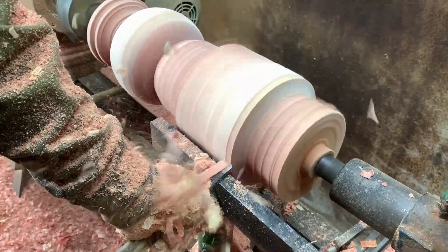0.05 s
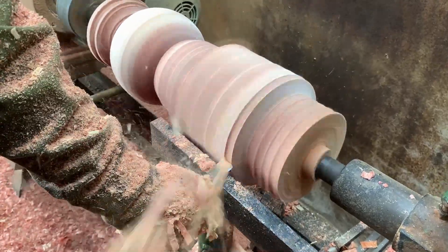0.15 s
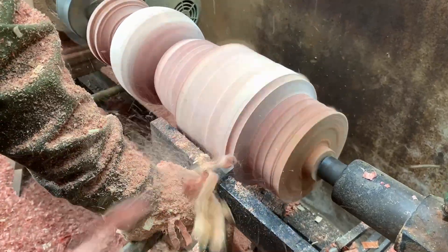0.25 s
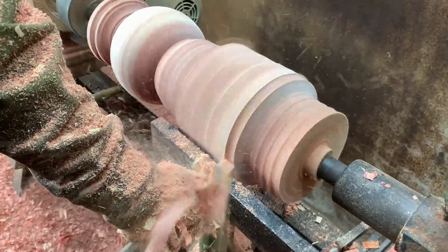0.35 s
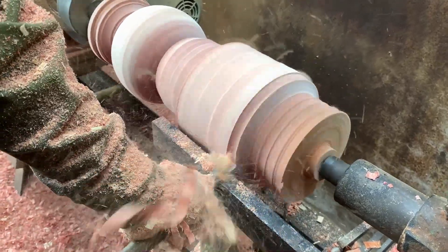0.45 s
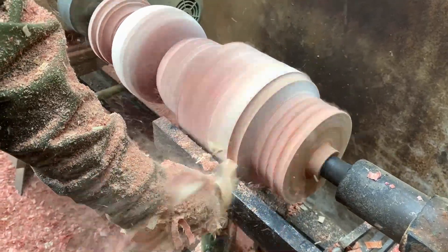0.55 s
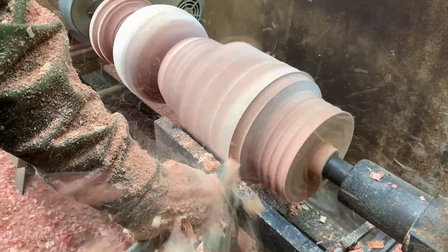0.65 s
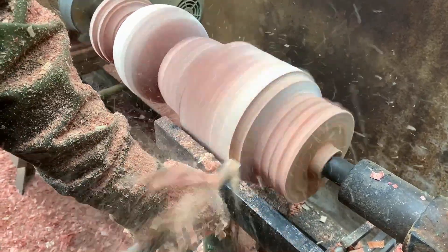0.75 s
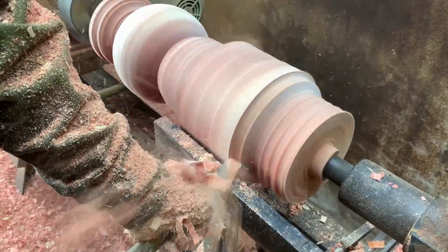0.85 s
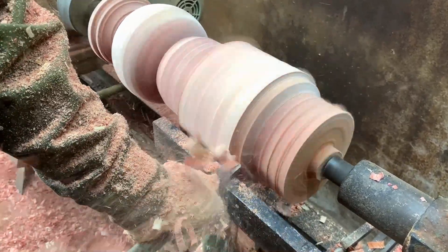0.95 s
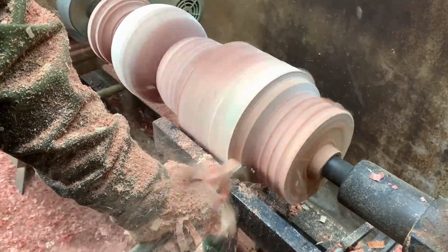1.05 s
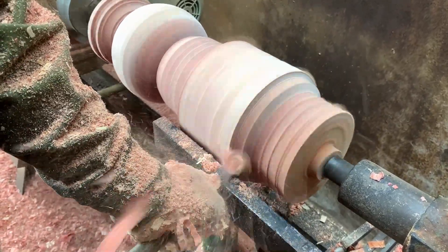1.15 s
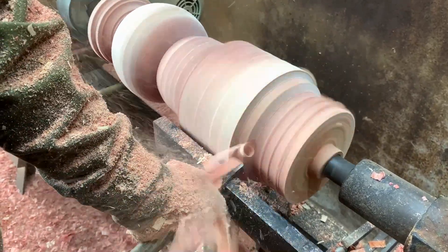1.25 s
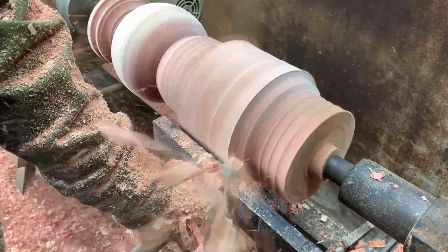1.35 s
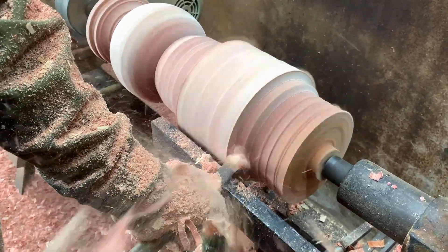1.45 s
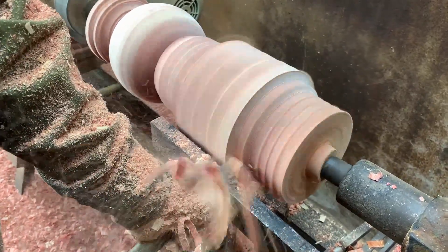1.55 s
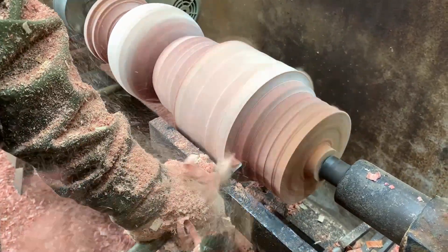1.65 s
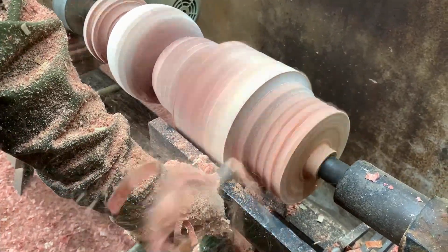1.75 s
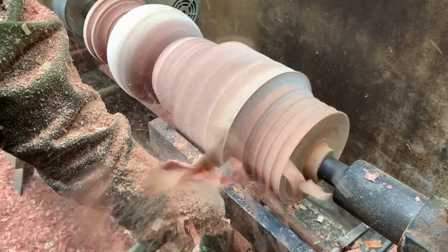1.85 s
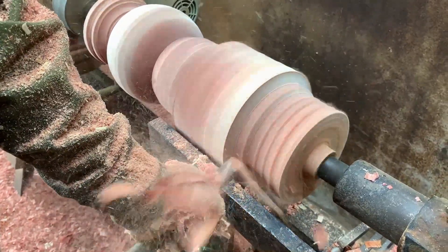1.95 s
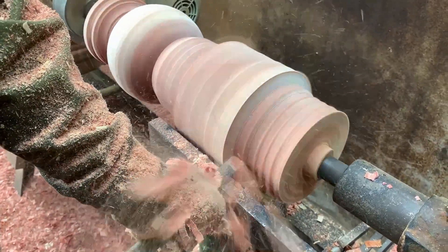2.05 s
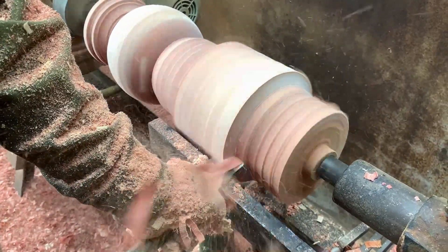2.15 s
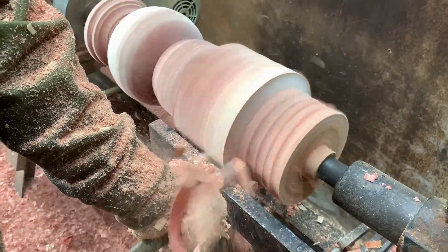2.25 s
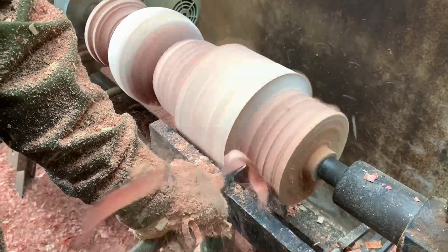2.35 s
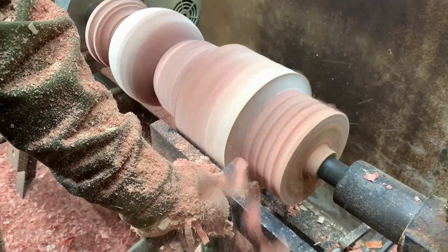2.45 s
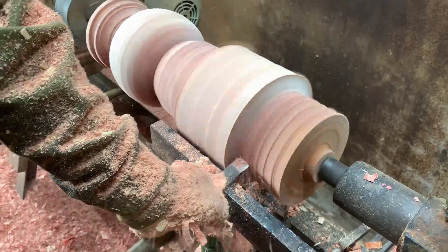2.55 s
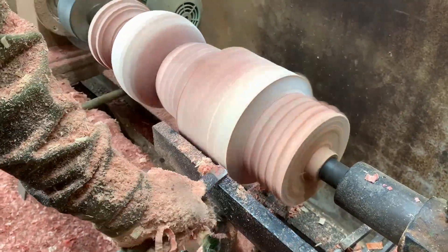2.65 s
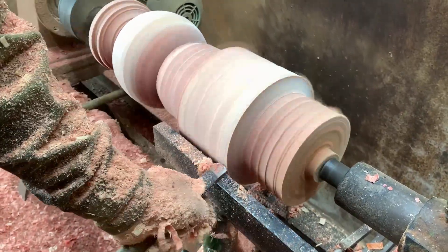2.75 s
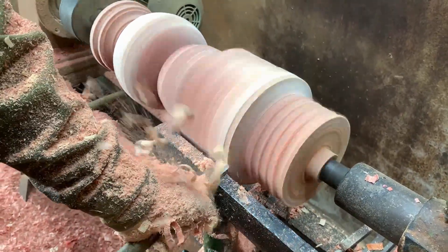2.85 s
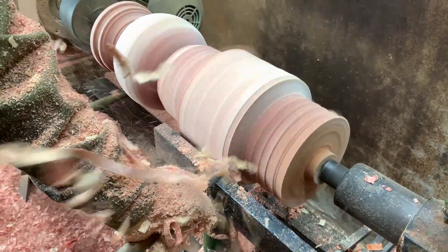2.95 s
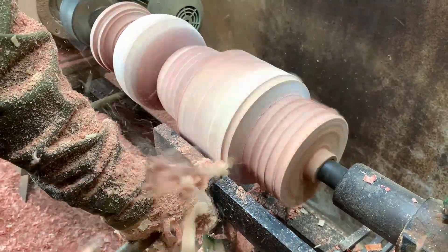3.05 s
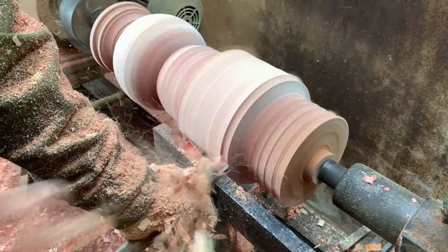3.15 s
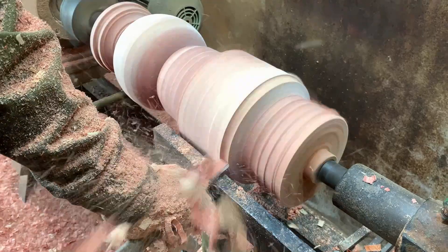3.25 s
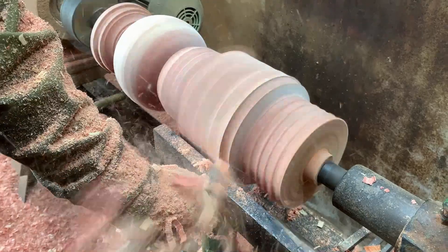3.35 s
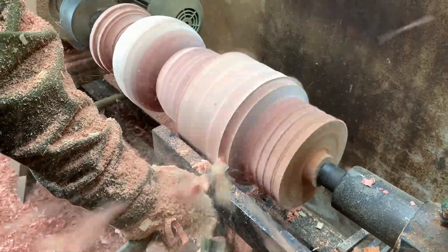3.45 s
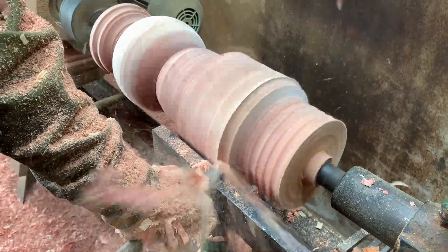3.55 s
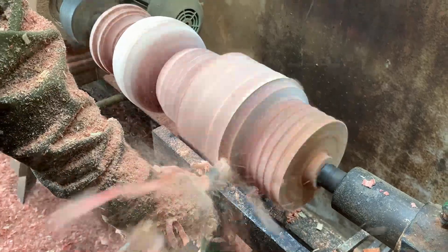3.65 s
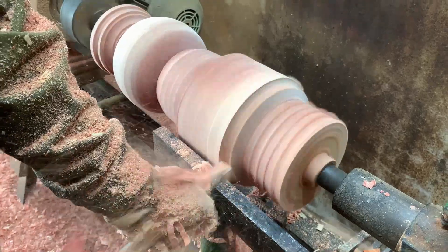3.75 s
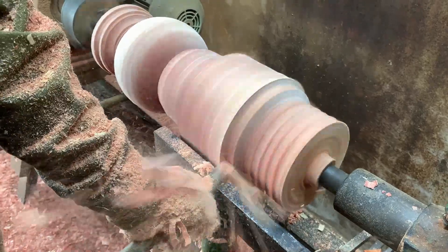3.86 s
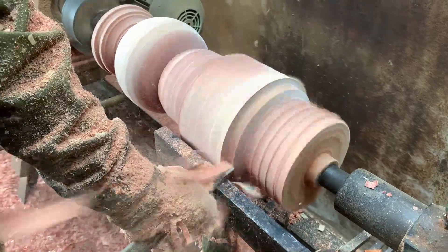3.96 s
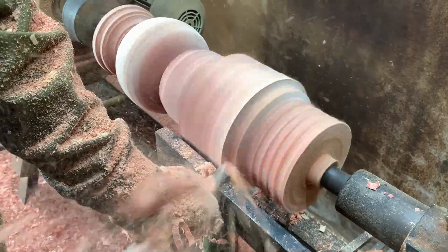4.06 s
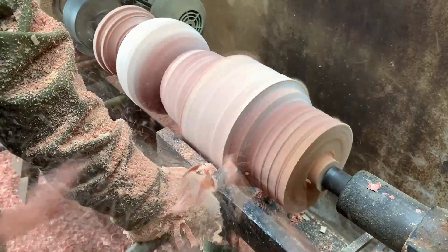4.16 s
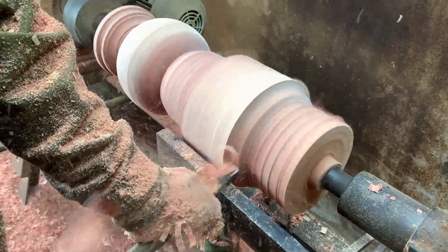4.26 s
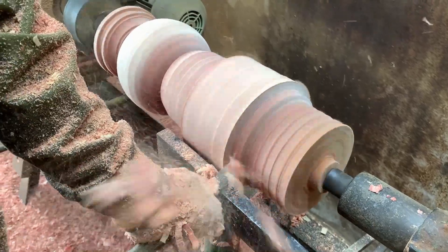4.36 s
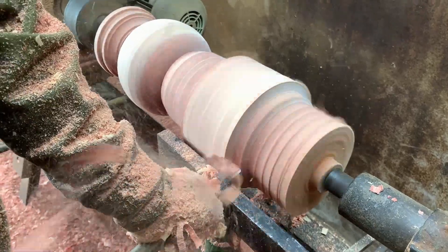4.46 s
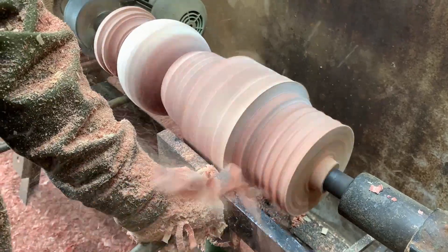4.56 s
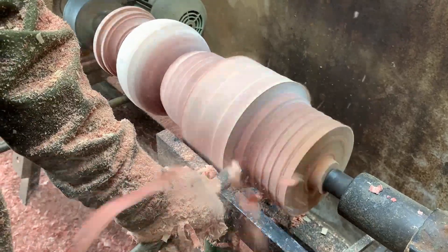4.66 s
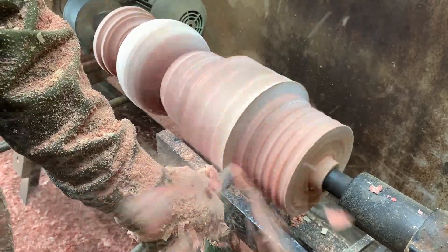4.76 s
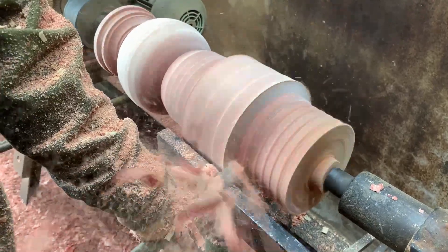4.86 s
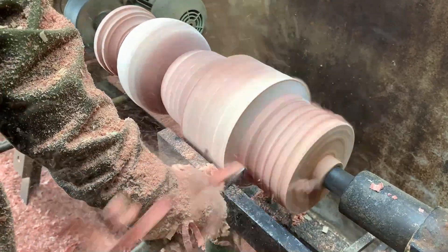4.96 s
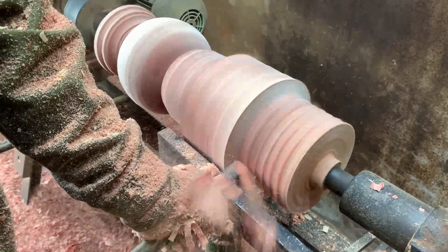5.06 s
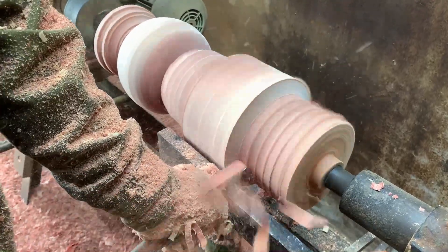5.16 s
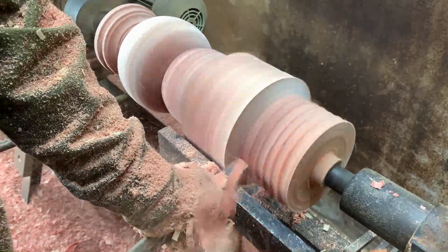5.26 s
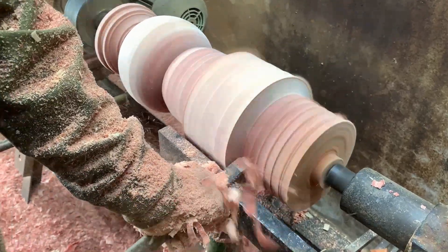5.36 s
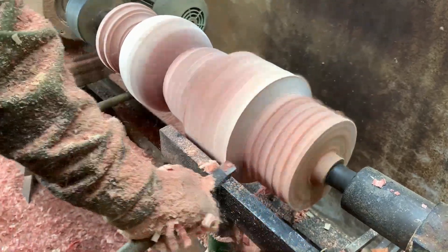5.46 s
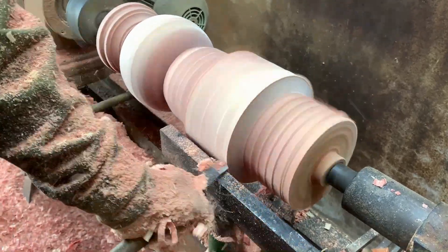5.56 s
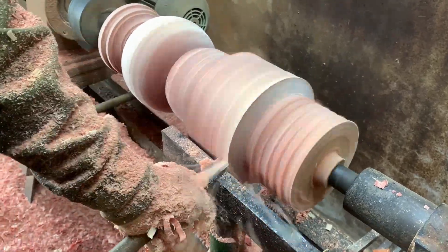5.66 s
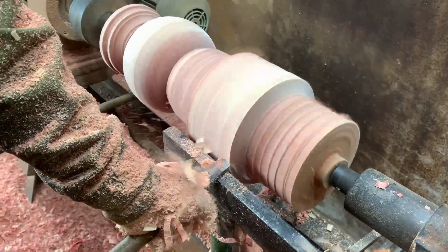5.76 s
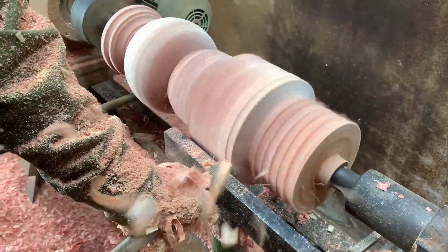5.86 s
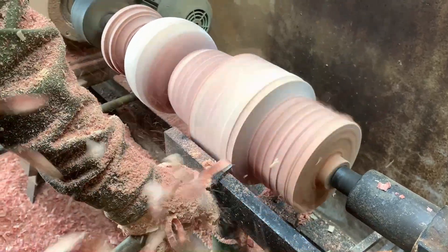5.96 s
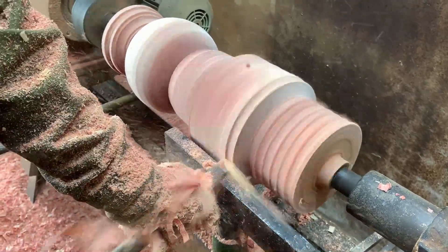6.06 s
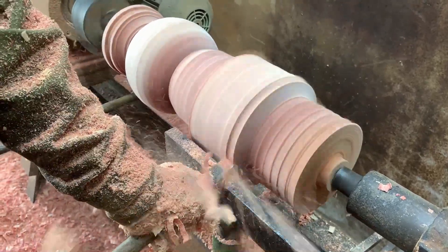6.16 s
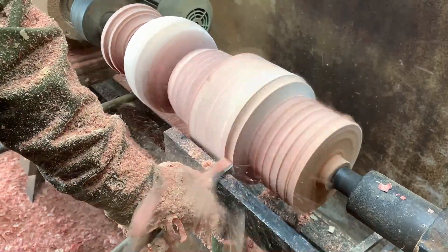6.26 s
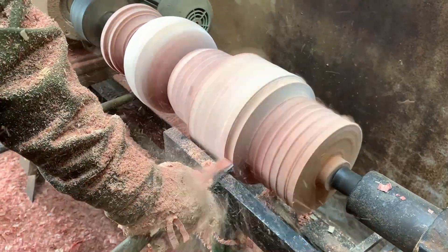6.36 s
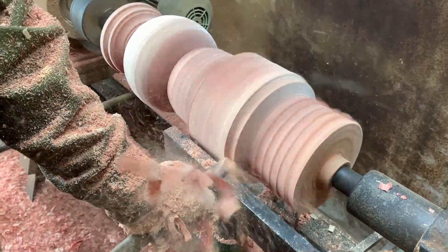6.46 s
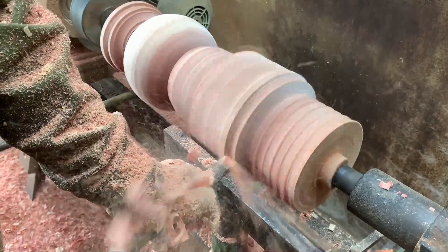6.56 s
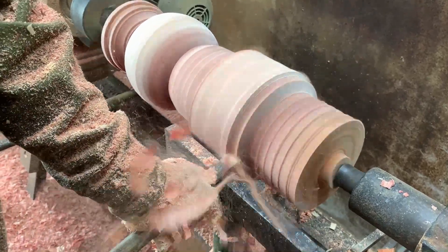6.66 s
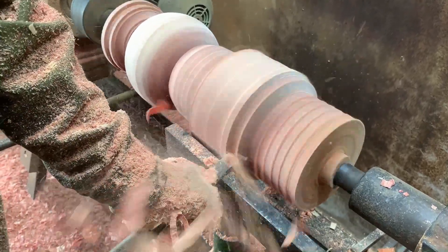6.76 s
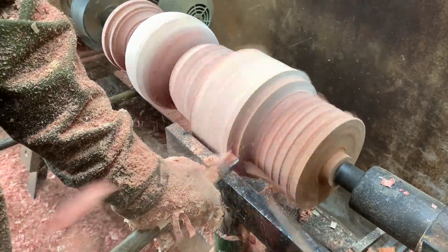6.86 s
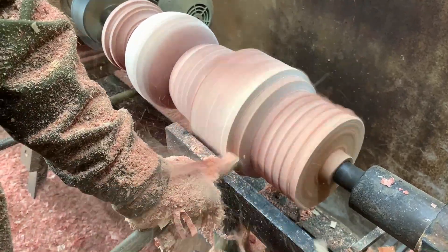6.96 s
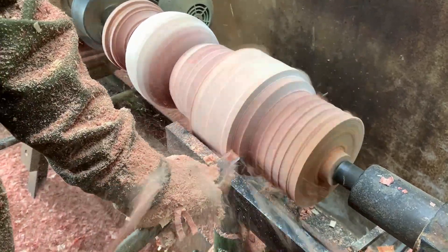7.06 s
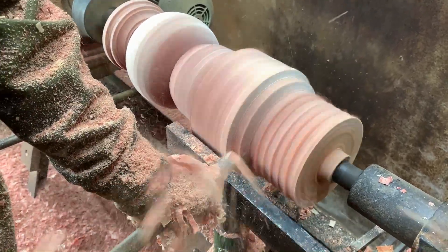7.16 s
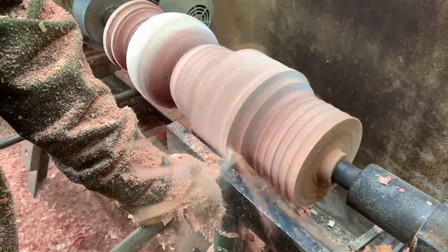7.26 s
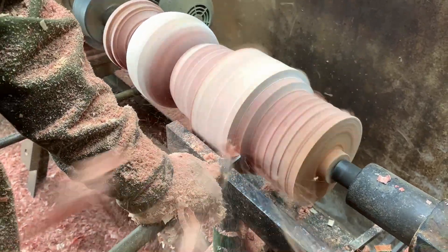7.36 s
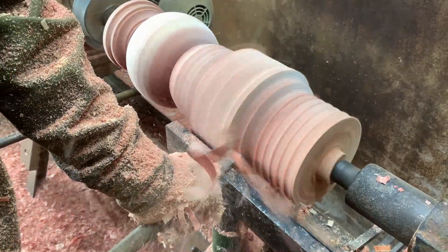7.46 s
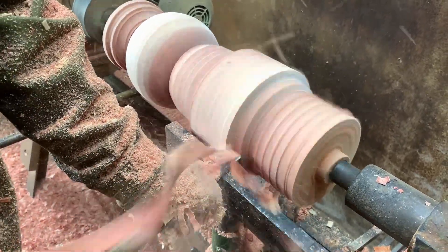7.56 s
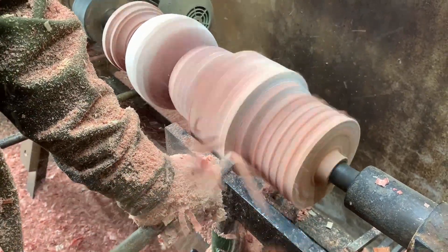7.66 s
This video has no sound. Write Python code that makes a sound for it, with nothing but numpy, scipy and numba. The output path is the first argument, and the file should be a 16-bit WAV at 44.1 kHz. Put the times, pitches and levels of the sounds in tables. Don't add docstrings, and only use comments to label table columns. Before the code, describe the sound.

Close woodturning on a lathe: bright fluttering scraping squeals downward as the cut deepens, breaks off twice, stutters back in, while shavings softly thud.

```python
import sys
import numpy as np
from scipy import signal
from scipy.fft import rfft, irfft
from scipy.io import wavfile
from scipy.ndimage import uniform_filter1d
from numba import njit

SR = 44100
rng = np.random.default_rng(int(sys.argv[2]) if len(sys.argv) > 2 else 0)


def file_out(sig):
    cols = np.atleast_2d(sig).T
    lim = np.clip(cols, -1, 1)
    pcm = np.round(lim * 32767).astype(np.int16)
    wavfile.write(sys.argv[1], SR, pcm)


def gain_from_db(level_db):
    decades = np.asarray(level_db, float) / 20
    return 10 ** decades


N = 339570

# (from [s], to [s], level against the force [dB], rise [dB/s], fall [dB/s])
CONTACTS = [(-1, 2.555, 0, 1000, 380), (2.57, 2.6, -10, 500, 520), (2.857, 2.885, 0, 2200, 1500),
            (2.89, 2.91, -11, 900, 900), (2.922, 5.375, 0, 1400, 280), (5.4, 5.445, -9, 500, 560),
            (5.704, 5.73, -8, 2500, 700), (5.762, 5.79, -3, 1500, 400), (5.8, 5.85, -8, 500, 500),
            (5.865, 5.895, -2.5, 700, 200), (5.925, 9, 0, 300, 300)]
STATIONS = np.linspace(0, 1, 5)


def gouge():
    # (time [s], depth [0-1])
    depth_path = [(0, .02), (.7, 0.23), (1.3, 0.46), (2.0, 0.73), (2.65, 0.92), (2.84, 0.07), (3.5, 0.24),
                  (4.15, 0.53), (4.8, 0.77), (5.5, 0.94), (5.69, 0.04), (6.4, 0.17), (7.0, 0.4),
                  (7.7, 0.61)]
    # (time [s], level [dB])
    force_path = [(0, .7), (.3, 1.5), (.6, 0), (.8, 1.2), (1.15, 0), (1.5, 2), (1.75, -1.8), (2.2, .5),
                  (3, -.5), (3.25, 1.5), (3.45, -1.5), (4.25, 1.5), (4.5, -1), (4.85, 1.5), (5.1, -.5),
                  (6.5, -2.6), (6.9, 1.2), (7.3, -2.2)]
    # (width [Hz], pitch at each station [Hz], top at each station [dB])
    blank_modes = [(250, [454, 454, 420, 454, 454], [-13.5, -20, -20.5, -21, -15.5]),
                   (68, [595, 595, 595, 595, 598], [0, 0, 0, 0, 0]), (700, [920, 950, 900, 930, 900],
                   [-15.5, -22.5, -19, -17, -20]), (140, [1100, 1060, 1066, 1084, 1055],
                   [-10, -15, -13.5, -7.5, 7]), (157, [1203, 1205, 1160, 1195, 1200],
                   [-12, -11.5, -9, -11.5, -28])]
    tool_modes = [(850, [1760, 1900, 1940, 1840, 1670], [-44.5, -15.5, -14.5, -11.5, -18.5]),
                  (170, [2560, 2303, 2227, 1950, 1700], [-0.5, 2, 1, 1, 5]),
                  (487, [2180, 2220, 2650, 2340, 2210], [0, -9, -15, -14, -9.5]),
                  (216, [3823, 3192, 2995, 3006, 2960], [15, 11, -0.5, -4, 0]),
                  (1300, [3640, 3150, 3200, 3730, 3600], [3.5, 4, -13, -15, -15.5]),
                  (320, [4900, 4760, 4880, 4870, 4840], [9, 0.5, -11, -12, -15.5]),
                  (930, [4940, 4900, 5300, 5150, 5270], [-7, -4, -18.5, -16, -21])]
    edge_modes = [(288, [6620, 6377, 6650, 6360, 6300], [-13.5, -1, -7.5, -27, -35]),
                  (1450, [6660, 7090, 7560, 8040, 8300], [2.5, -10, -15.5, -14.5, -19]),
                  (424, [8200, 8160, 8430, 8640, 8100], [4, -1.5, -3, -1, 7]),
                  (4000, [9800, 9660, 8950, 10200, 9050], [-6, -9.5, -6.5, -7.5, -4]),
                  (300, [9950, 9900, 10100, 10300, 9900], [-5, -16, -3, -25, -9]),
                  (350, [10900, 10330, 10600, 10440, 10500], [-27, -11, -2, -17, -26]),
                  (300, [11800, 11800, 11800, 11820, 11800], [-19, -19, -17, -11, -13]),
                  (350, [12420, 12420, 12450, 12400, 12350], [-4.5, -4.5, -5, -9, -11]),
                  (1330, [13040, 12780, 13190, 12230, 13000], [0.5, -3, 3.5, -5, -13]),
                  (2600, [14300, 13500, 14200, 14200, 14300], [-14, -9.5, -14, -13.5, -13])]
    blank_levels = [-42.5, -37.5, -37.5, -37, -34.5]
    tool_levels = [-23.7, -23.7, -24.2, -25.7, -27.2]
    edge_levels = [-30, -30.3, -31, -29.7, -30]
    keenness = [-.3, .8, -.4]
    # (pitch [Hz], width [Hz], share [0-1])
    notches = [
        (4090, 230, 0.7),
        (5664, 700, 0.85),
        (850, 150, 0.83),
    ]

    force_db, bite_db = in_time(force_path), bite()
    depth = np.clip(in_time(depth_path), 0, 1)

    blank_db = np.interp(depth, STATIONS, blank_levels) + .4 * force_db + contact(lets_go=.6) + lift_swell()
    tool_db = np.interp(depth, STATIONS, tool_levels) + force_db + contact(lets_go=1)
    edge_db = np.interp(depth, STATIONS, edge_levels) + .9 * force_db + contact(lets_go=1.4)
    edge_db = edge_db + by_pass(keenness)

    blank = ringing(blank_modes, bite_db, depth, follows=0.17, wobble_hz=2.7)
    tool = ringing(tool_modes, bite_db, depth, follows=.42, wobble_hz=25.0, crisp=.3)
    edge = ringing(edge_modes, bite_db, depth, follows=0.8, wobble_hz=40.0)
    edge = edge + air_pocket(bite_db, depth)

    rasp, shrill = skids()
    cut = gain_from_db(blank_db) * blank + gain_from_db(tool_db) * tool + gain_from_db(edge_db) * (1 + shrill) * edge
    for hz, width, share in notches:
        cut = cut - share * mode(cut, hz, width, 1.)
    return cut + rasp


def bite():
    # (once, twice, thrice), swing [dB]
    grain_swing = [(2.3, 1.1, .9), (2.1, 1.1, 1.05), (3.2, .7, .9)]
    # (once, twice, thrice), delay [ms]
    grain_delay = [(6, 11, 5), (25, 8, 10.5), (45, 14, 8)]
    # (time [s], peak [dB])
    hard_spots = [(0.1067, -17), (0.2458, -15), (0.3137, -12), (0.3531, -17), (0.6055, -15), (1.504, -14),
                  (1.5369, -15), (1.6886, -18), (1.8981, -16), (2.0767, -16), (3.0649, -16), (3.0849, -14),
                  (3.2071, -11), (3.3273, -14), (3.4022, -15), (3.4231, -13), (3.6706, -18), (3.9045, -16),
                  (4.0477, -18), (4.4353, -16), (4.7496, -14), (4.809, -14), (5.0814, -18), (5.2111, -17),
                  (5.248, -16), (5.9249, -19), (6.9247, -17), (7.1846, -17), (7.224, -14), (7.5418, -17)]
    # (first time [s], bites [count], spacing [s], peak [dB])
    knots = [(.7055, 2, .06, -19), (.8430, 3, .06, -16), (1.1435, 8, .06, -15.5), (1.7820, 3, .058, -16),
             (2.14, 3, .05, -17), (2.3195, 3, .06, -17), (2.855, 3, .012, -16), (2.919, 2, .011, -15),
             (2.9485, 2, .02, -17), (4.1705, 3, .06, -15), (4.4510, 9, .0597, -14), (5.703, 2, .058, -17),
             (6.0430, 8, .06, -18)]
    turn_s, knot_spread_db = .06, 1.2

    t = np.arange(N)[:, None] / SR - by_pass(grain_delay) / 1000
    grain = by_pass(grain_swing) * np.cos(2 * np.pi * np.arange(1, 4) * t / turn_s)
    grain_db = np.sum(grain, axis=1)
    chatter_db = 0.35 * drift(36.0)[0] + 1.8 * drift(70.0)[0] + 4.0 * drift(250.0)[0]

    bites = list(hard_spots)
    for first_s, count, every_s, peak_db in knots:
        for k in range(count):
            bites.append((first_s + k * every_s, peak_db + knot_spread_db * rng.standard_normal()))
    s, peak_db = np.transpose(bites)
    spots = bursts(s - .0015, gain_from_db(peak_db + 18), 0 * s + .006)
    return 1.05 * grain_db + 5 * np.tanh(chatter_db / 5) + 20 * np.log10(1 + spots)


def ringing(modes, bite_db, depth, follows, wobble_hz, crisp=0):
    groove_lift_db, groove_width_hz, crisp_above_hz = 11, 500, 3000
    grip = gain_from_db(follows * bite_db)
    grip = grip / np.sqrt(uniform_filter1d(grip ** 2, size=9000))
    tearing = grip * rng.standard_normal((2, 2, N))
    groove_hz, _ = groove(depth)
    out, power = 0, 0
    for k, (width, pitches_hz, tops_db) in enumerate(modes):
        hz = np.interp(depth, STATIONS, pitches_hz) + wobble_hz * drift(25.4)[0]
        top_db = np.interp(depth, STATIONS, tops_db) + 1.33 * drift(5.5)[0] + 1.66 * drift(29.0)[0]
        if width < 800:
            top_db = top_db + groove_lift_db * np.exp(-((hz - groove_hz) / groove_width_hz) ** 2)
        octaves = max(np.log2(pitches_hz[1] / crisp_above_hz), 0)
        top = gain_from_db(top_db + crisp * octaves * bite_db)
        out = out + mode(tearing[k % 2], hz, width, top)
        power = power + top ** 2 * np.pi * width / SR / 2
    return out / np.sqrt(uniform_filter1d(power, size=9000))


def air_pocket(bite_db, depth):
    hz, level_db = groove(depth)
    hiss = gain_from_db(bite_db) * rng.standard_normal((2, N))
    return rms_one(mode(hiss, hz + 220 * drift(9.0)[0], 600, 1.)) * gain_from_db(level_db)


def groove(depth):
    # (depth [0-1], pitch [Hz], level above the edge [dB])
    pocket = [(0, 12600, -14), (.61, 12550, -7), (.69, 12150, -7), (.735, 11600, -8), (.765, 10700, -5.5),
              (.83, 10250, -5), (.88, 9800, -8), (.92, 8300, -8)]
    lag = [.02, .035, 0]
    at, hz, level_db = np.transpose(pocket)
    opened = depth - by_pass(lag)
    return np.interp(opened, at, hz), np.interp(opened, at, level_db)


def skids():
    # (time [s], level [dB], length [s])
    slips = [
        (2.847, -29.5, 0.069),
        (2.873, -26, 0.033),
        (5.65, -57, .05),
        (5.699, -35, 0.059),
        (5.753, -41, .04),
    ]
    s, level_db, length_s = np.transpose(slips)
    band = signal.butter(2, [2100, 5600], "band", fs=SR, output="sos")
    rasp = rms_one(signal.sosfilt(band, rng.standard_normal((2, N))))
    shrill = bursts(s, gain_from_db(level_db + 33), 0.65 * length_s)
    return rasp * bursts(s, gain_from_db(level_db), 0.65 * length_s), shrill


def contact(lets_go):
    t = np.arange(N) / SR
    grips = []
    for start, end, level_db, rise, fall in CONTACTS:
        missing_db = rise * np.maximum(start - t, 0) + lets_go * fall * np.maximum(t - end, 0)
        grips.append(level_db - missing_db)
    return np.max(grips, axis=0)


def lift_swell():
    t = np.arange(N) / SR
    ends_s = [end for start, end, *_ in CONTACTS if end - start > 1]
    return sum(2.5 * np.exp(-((t - end) / .06) ** 2) for end in ends_s)


def by_pass(values):
    pass_starts = [2.75, 5.6]
    return np.array(values)[np.searchsorted(pass_starts, np.arange(N) / SR)]


def shavings():
    # (time [s], level [dB], length [s])
    gusts = [
        (.6, -56, .15),
        (.88, -50, .25),
        (4.08, -46, .08),
        (5.36, -54, .12),
        (5.665, -47, .06),
        (6.05, -57, .4),
    ]
    # (time [s], peak [dB], pitch [Hz], left over right [dB])
    thuds = [(0.049, -51, 231, -2.0), (0.193, -45, 78.1, -2.0), (0.915, -39, 160, -1.0),
             (1.049, -39, 88.8, -0.5), (1.149, -44, 86.1, -2.5), (1.394, -35, 266, -2.0),
             (1.459, -41, 96.9, 1.5), (1.9, -42, 72.7, -2.0), (2.197, -43, 223, -1.5),
             (2.355, -40, 129, -3.0), (3.399, -44, 91.5, 0.5), (3.649, -45, 48.4, -2.0),
             (4.097, -40, 161, -4.5), (4.619, -47, 237, -0.5), (5.299, -43, 72.7, -2.0),
             (5.661, -33, 143, -0.5), (5.672, -38, 67.3, -2.0), (6.449, -46, 221, 2.0),
             (6.716, -39, 96.9, -0.5), (6.899, -38, 96.9, -1.0)]
    low = signal.butter(2, [35, 150], "band", fs=SR, output="sos")
    air = rms_one(signal.sosfilt(low, rng.standard_normal((2, N))))
    s, gust_db, length_s = np.transpose(gusts)
    steady_db = -56 + np.maximum(contact(lets_go=.3), -7)
    lumps_db = 3.7 * drift(8.4) + 1.7 * drift(7.4, channels=2)
    out = (gain_from_db(steady_db) + bursts(s, gain_from_db(gust_db), length_s)) * gain_from_db(lumps_db) * air

    u = np.arange(2600) / SR
    for (s, peak_db, hz, pan_db), turns in zip(thuds, rng.random((len(thuds), 2))):
        push = 90 * u * np.exp(1 - 90 * u) * np.sin(2 * np.pi * (hz * u + turns[:, None]))
        shove = .3 * 70 * u * np.exp(1 - 70 * u) * np.sin(2 * np.pi * (55 * u + turns[::-1, None]))
        i = int((s + .012) * SR)
        out[:, i:i + len(u)] += gain_from_db(peak_db + pan_db * np.array([[.5], [-.5]])) * (push + shove)
    return out


def lathe():
    # (pitch [Hz], level per Hz [dB])
    motor = [(40, -11), (75, -6), (150, -6), (320, -18), (700, -5.5), (1100, -13), (2000, -16), (3500, -24),
             (6500, -28), (9000, -33), (12000, -30), (15500, -34)]
    # (pitch [Hz], width [Hz], level [dB])
    whines = [
        (226, 34, -56.5),
        (6900, 150, -74),
        (12100, 300, -74),
    ]
    # (time [s], peak [dB])
    ticks = [(2.6344, -50), (2.6908, -49), (2.7477, -51), (2.7794, -52), (2.8015, -51), (5.4894, -51),
             (5.5594, -55), (5.6271, -52), (5.6595, -50)]
    hz, (at_hz, level_db) = np.fft.rfftfreq(N, 1 / SR), np.transpose(motor)
    colour = gain_from_db(np.interp(np.log(hz + 1), np.log(at_hz), level_db))
    out = gain_from_db(-54) * rms_one(irfft(rfft(rng.standard_normal((2, N))) * colour, N))
    for tone_hz, width, tone_db in whines:
        out += gain_from_db(tone_db) * rms_one(mode(rng.standard_normal((2, N)), tone_hz, width, 1.))

    fan_hz, fan_db = 627, -52.5
    turns = np.cumsum(fan_hz + 3 * drift(3.0)[0]) / SR + [[0], [.2]]
    out += gain_from_db(fan_db + 3 + 1.5 * drift(8.0, channels=2)) * np.sin(2 * np.pi * turns)

    s, peak_db = np.transpose(ticks)
    high = signal.butter(2, 6000, "high", fs=SR, output="sos")
    bright = signal.sosfilt(high, rng.standard_normal((2, N)))
    return out + bright * bursts(s, gain_from_db(peak_db - 2), 0 * s + .006)


def in_time(rows):
    s, value = np.transpose(rows)
    return np.interp(np.arange(N) / SR, s, value)


def rms_one(x):
    return x / np.sqrt(np.mean(x ** 2) + 1e-20)


def drift(rate, channels=1):
    r = np.exp(-32 * np.pi * rate / SR)
    noise = rng.standard_normal((channels, N // 16 + 2002))
    slow = rms_one(signal.lfilter([1], [1, -2 * r, r * r], noise)[:, 2000:])
    return np.array([np.interp(np.arange(N) / 16, np.arange(len(v)), v) for v in slow])


@njit
def resonate(x, r, bend, gain):
    y, z = np.zeros_like(x), np.zeros_like(x)
    for c in range(x.shape[0]):
        for i in range(2, x.shape[1]):
            y[c, i] = gain[i] * (x[c, i] - x[c, i - 2]) + bend[i] * y[c, i - 1] - r * r * y[c, i - 2]
            again = (1 - r * r) / 2 * (y[c, i] - y[c, i - 2])
            z[c, i] = again + bend[i] * z[c, i - 1] - r * r * z[c, i - 2]
    return z


def mode(x, hz, width, top):
    r, one = np.exp(-np.pi * width / SR), np.ones(N)
    return resonate(x, r, 2 * r * np.cos(2 * np.pi * hz / SR) * one, top * (1 - r * r) / 2 * one)


def bursts(at_s, heights, lengths_s):
    out = np.zeros(N)
    for s, height, length in zip(at_s, heights, lengths_s):
        i, u = int(s * SR), np.arange(int(5 * length * SR)) / (length * SR)
        out[i:i + len(u)] += (height * 3 * u * np.exp(1 - 3 * u))[:N - i]
    return out


def scene():
    return (gouge() + shavings() + lathe()) * gain_from_db([[-.5], [.5]])


def roll_off(x):
    return signal.sosfilt(signal.butter(12, 15830, fs=SR, output="sos"), x)


def record(dry):
    mix = signal.sosfilt(signal.butter(6, 15300, fs=SR, output="sos"), dry)
    return roll_off(mix)


dry = scene()
out = record(dry)
file_out(out)
```